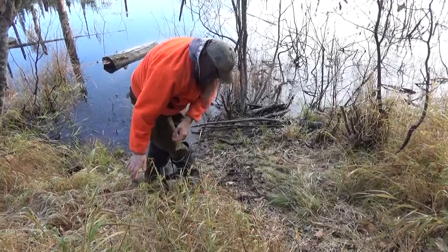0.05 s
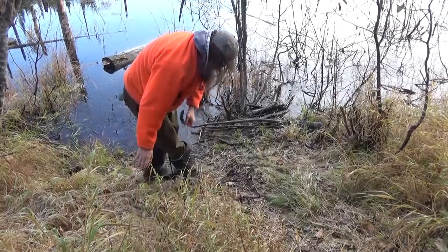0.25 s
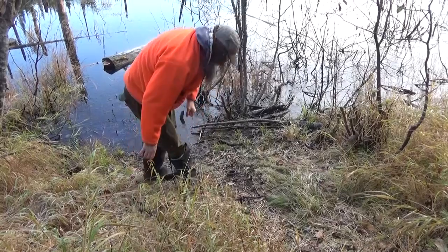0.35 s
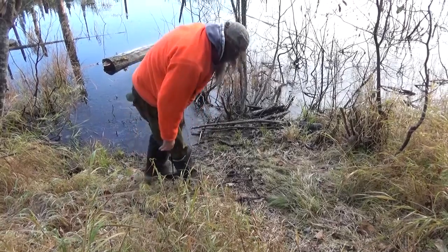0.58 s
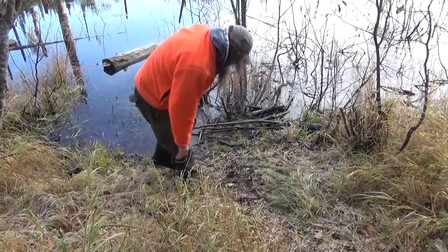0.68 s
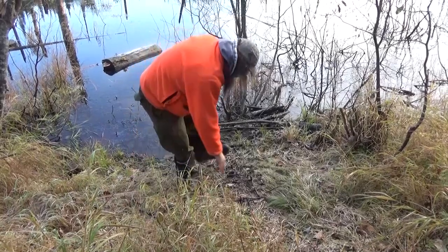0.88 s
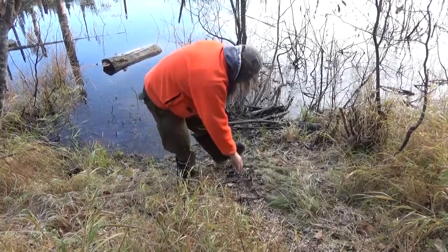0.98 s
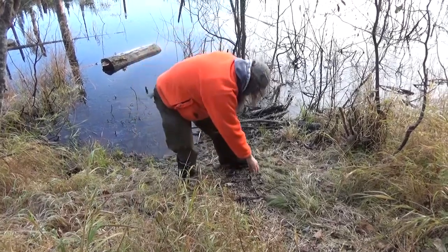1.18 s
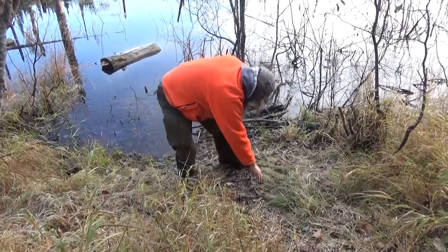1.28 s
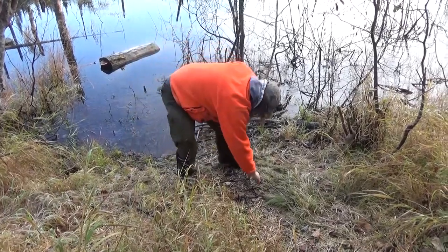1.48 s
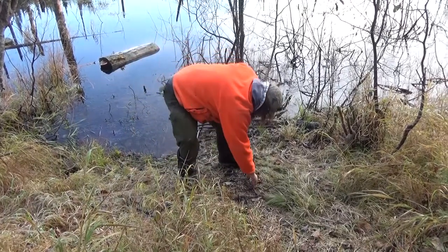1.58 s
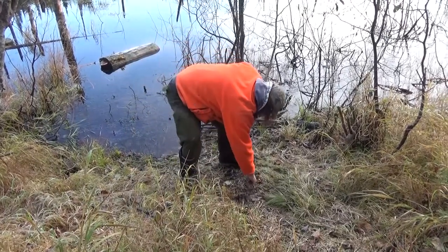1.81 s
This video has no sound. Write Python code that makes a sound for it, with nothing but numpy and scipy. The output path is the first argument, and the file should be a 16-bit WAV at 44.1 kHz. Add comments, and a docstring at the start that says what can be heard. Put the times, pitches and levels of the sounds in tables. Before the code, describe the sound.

Brief bright clatter of a dropped metal trap and chain, then dry grass rustles softly.

```python
"""Steel trap dropped on a riverbank

A few metres from a stereo microphone, a little left, a steel trap and its chain slide through dry grass
and clatter onto the bank. Links knock against the ringing jaws, the trap settles with one last clack,
and the trees return a faint tail. Then grass rustles, a boot presses the wet ground and something
small ticks, over quiet open air and a low hum."""
import sys
import numpy as np
from scipy import signal
from scipy.fft import rfft, irfft
from scipy.io import wavfile

SR = 44100
rng = np.random.default_rng(int(sys.argv[2]) if len(sys.argv) > 2 else 0)


def waveform_to_disk(signal):
    """Save audio, clipped to [-1, 1], as 16-bit WAV at the path in sys.argv[1]."""
    frames = np.transpose(np.atleast_2d(signal))
    scaled = np.clip(frames, -1, 1) * 32767
    samples = np.round(scaled).astype(np.int16)
    wavfile.write(sys.argv[1], SR, samples)


N = 81585
T = np.arange(N) / SR
EDGE_HZ = 15850  # top of the recorder's band
CONTACT_S, GROUNDED_S = .0005, .5  # attack of steel on steel; when the trap comes to lie in the grass


def amp(db):
    """Decibels to gain."""
    return 10 ** (np.asarray(db) / 20)


def unit(x):
    """Scales to rms 1."""
    return x / np.sqrt(np.mean(x ** 2) + 1e-20)


def read(points, hz):
    """Reads a table on a log-frequency axis."""
    f, value = np.transpose(points)
    return np.interp(np.log(hz + 1), np.log(f + 1), value)


def colour(x, points):
    """Filters by a table of f/Hz, gain/dB."""
    size = x.shape[-1]
    return irfft(rfft(x) * amp(read(points, np.fft.rfftfreq(size, 1 / SR))), size)


def add(mix, s, sound):
    """Mixes a sound in at s seconds."""
    part = mix[max(round(s * SR), 0):][:len(sound)]
    part += sound[:len(part)]


def decay(t, t60):
    """Falls by 60 dB in t60 seconds."""
    return np.exp(-np.log(1000) * t / t60)


def strike(t, t60, hold=0):
    """Envelope of struck steel: a fast rise, then a decay that starts at hold seconds."""
    return np.minimum(t / CONTACT_S, 1) * decay(np.maximum(t - hold, 0), t60)


def drift(rate_hz):
    """Slow random wander of rms 1."""
    lowpass = np.exp(-(np.fft.rfftfreq(N, 1 / SR) / rate_hz) ** 2)
    return unit(irfft(rfft(rng.standard_normal(N)) * lowpass, N))


def burst(db, hz, octaves, t60):
    """A dying puff of noise around one frequency."""
    t, f = T[:8192], np.fft.rfftfreq(8192, 1 / SR)
    band = np.exp(-.5 * (np.log2((f + 1) / hz) / octaves) ** 2)
    noise = unit(irfft(band * np.exp(2j * np.pi * rng.random(len(f)))))
    return amp(db) * noise * np.minimum(t * hz, 1) * decay(t, t60)


def crackle(spectrum, per_s=5000, spread_db=.5):
    """Dense tiny clicks of uneven size, coloured by a spectrum, at rms 1."""
    sizes = rng.standard_normal(N) * amp(spread_db * np.minimum(rng.exponential(1, N), 4))
    return unit(colour(sizes * (rng.random(N) < per_s / SR), spectrum))


# Stereo width of the surroundings at the microphone: f/Hz, side gain/dB
WIDTH = [(200, -22.5), (600, -8.5), (5000, -6), (11000, -15)]
def widen(mid, side):
    """Mid and side to left and right, nearly mono in the bass."""
    return mid + np.array([[1], [-1]]) * colour(side, WIDTH)


# Open air over the bank: f/Hz, gain/dB
AIR_SPECTRUM = [(30, -29), (70, -14.5), (200, -9), (300, -2), (420, -5), (1200, -2), (1900, -6.5),
                (3200, -14), (5000, -19), (9000, -25), (12500, -23.5), (15500, -23)]
def air(db=-59.5):
    """A quiet, steady wash of noise all around the microphone."""
    mid, side = (amp(db) * unit(colour(rng.standard_normal(N), AIR_SPECTRUM)) for _ in range(2))
    return widen(mid, side)


# Steady upper lines of the hum: f/Hz, level/dB
HUM_LINES = [(193.6, -74), (289, -72), (1008, -70.5), (1338, -69)]
# Level of the lowest line, which drops out twice as the recorder's noise suppression ducks it:
# t/s, level/dB
HUM_LOW_LEVEL = [(.15, -89), (.45, -69.5), (.9, -71), (1.17, -87), (1.45, -74)]
def hum(lowest_hz=95.5, waver=.0066):
    """A faint hum in the centre, each line wavering in pitch on its own."""
    out = np.zeros(N)
    for hz, db in [(lowest_hz, np.interp(T, *np.transpose(HUM_LOW_LEVEL)))] + HUM_LINES:
        pitch = hz * (1 + waver * drift(rate_hz=21.6))
        out += np.sqrt(2) * amp(db) * np.sin(2 * np.pi * np.cumsum(pitch) / SR)
    return out


# Decay of the tail from the trees: f/Hz, time to fall by 66 dB/s
TREE_DECAY = [(200, 6.3), (1400, 2.13), (3000, 0.45), (8000, 0.65), (15000, 0.22)]
def trees(x, db=-19.5, rise_s=.008):
    """Trunks and the far bank scatter a faint one-second tail back to the microphone."""
    hz, t, spectra = signal.stft(rng.standard_normal((2, SR)), SR, nperseg=256)
    fade = 0.00049 ** (t / read(TREE_DECAY, hz)[:, None])
    scatter = signal.istft(spectra * fade, SR, nperseg=256)[1][:, :SR]
    mid, side = scatter * np.minimum(T[:SR] / rise_s, 1)
    tail = widen(mid, side) / np.linalg.norm(mid)
    return amp(db) * signal.fftconvolve(x[None], tail, axes=1)[:, :N]


# Small ticks in the background: t/s, level/dB, centre f/Hz
TICKS = [(0.108, -42, 5700), (1.549, -51, 5500), (1.561, -50, 5100), (1.575, -51, 5930), (1.594, -51, 5100),
         (1.619, -54, 5040)]
def ticks():
    """Faint high ticks: one at the start, a short run near the end."""
    out = np.zeros(N)
    for s, db, hz in TICKS:
        add(out, s, burst(db, hz, octaves=.21, t60=.026))
    return out


# Rustle of dry grass: f/Hz, gain/dB
GRASS_SPECTRUM = [(80, -69), (500, -11.5), (2000, -7.5), (3500, -11), (5200, -5.5), (6800, -4.5),
                  (8400, 0.5), (10500, -4), (12000, -12), (15500, -23.5)]
# How hard the grass is brushed: t/s, level/dB
BRUSHING = [(0, -48.5), (.154, -50), (.159, -42.5), (.188, -39.5), (.196, -35.5), (.22, -34), (.3, -47.5),
            (.48, -47.5), (.6, -53.5), (.67, -52), (.75, -64), (1.11, -67), (1.126, -48.5), (1.15, -58),
            (1.172, -44), (1.205, -53.5), (1.28, -59), (1.302, -52.5), (1.335, -60.5), (1.43, -61),
            (1.475, -55.5), (1.52, -63), (1.85, -65)]
# Single stalks snapping: t/s, level/dB, centre f/Hz
SNAPS = [(.955, -40.5, 7340), (1.3227, -39.5, 9700), (1.478, -49, 5800), (1.595, -50, 3560)]
def grass():
    """Brushed dry stalks crackle with tiny breaks, and a few snap."""
    out = crackle(GRASS_SPECTRUM) * amp(np.interp(T, *np.transpose(BRUSHING)))
    for s, db, hz in SNAPS:
        add(out, s, burst(db, hz, octaves=.45, t60=.006))
    return out


# Squelch of wet leaves underfoot: f/Hz, gain/dB
SQUELCH_SPECTRUM = [(80, -47), (300, -31), (1100, -8), (1800, 7.5), (3000, 5), (4500, -3), (12000, -32)]
def boot(peak_s=1.472, db=-52, rise_s=.04, fall_s=.017):
    """One step presses wet leaves: the squelch swells and dies quickly."""
    press = np.exp(-np.maximum((peak_s - T) / rise_s, (T - peak_s) / fall_s))
    return amp(db) * press * crackle(SQUELCH_SPECTRUM)


# Dull blows on soft ground: t/s, level/dB, centre f/Hz, t60/s
THUDS = [(.2395, -32.5, 880, .03), (1.4765, -48, 720, .04)]
def soil(sink_s=.238, sink_db=-50.5, length_s=.022, start_hz=380, sag_octaves=1.5):
    """Dull thuds, and a low push whose pitch falls as the bank gives way under the trap."""
    out = np.zeros(N)
    for s, db, hz, t60 in THUDS:
        add(out, s, burst(db, hz, octaves=.18, t60=t60))
    progress = np.arange(0, 1, 1 / (length_s * SR))
    pitch = start_hz * 2 ** (-sag_octaves * progress)
    push = np.sin(np.pi * progress) * np.sin(2 * np.pi * np.cumsum(pitch) / SR)
    add(out, sink_s, amp(sink_db) * push)
    return out


# Short rings of the chain: f/Hz
CHAIN_HZ = [4107, 4404, 4603, 5200, 5685, 6050, 6412, 8230]
def jangle(db=-5, t60=.05, detune=.008):
    """One shake of the chain: a different few of its rings stand out each time."""
    t, count = T[:4096], len(CHAIN_HZ)
    hz = np.array(CHAIN_HZ) * (1 + detune * rng.standard_normal(count))
    share = rng.exponential(1, count)
    rings = np.sin(2 * np.pi * (hz[:, None] * t + rng.random((count, 1))))
    return amp(db) * (share / np.linalg.norm(share) @ rings) * strike(t, t60)


# Single links and loose parts ringing out: t/s, f/Hz, level/dB, t60/s
CLINKS = [(.262, 5800, -19, .04), (.262, 7134, -23, .08), (.275, 8350, -24, .09), (.276, 6000, -22, .06),
          (.277, 10427, -33, .13), (.285, 12350, -39, .3), (.299, 8797, -23, .075), (.333, 3492, -27, .06),
          (.333, 8900, -28, .05), (.349, 2702, -30, .08), (.357, 3505, -30, .19), (.386, 8820, -22, .06),
          (.2212, 5750, -30, .03), (.3255, 5100, -28, .05), (.349, 5000, -28, .035), (.377, 5141, -28, .07),
          (.427, 4450, -35, .025), (.532, 3499, -36, .07), (.568, 4170, -41, .045), (.57, 6430, -46, .04),
          (.593, 6430, -43, .04)]
def clinks(twin_db=-9):
    """Each link rings with one mode and a weaker twin that beats against it."""
    out, t = np.zeros(N), T[:SR // 2]
    for s, hz, db, t60 in CLINKS:
        twin_hz = hz + rng.uniform(-58, 50)
        twin = amp(twin_db) * np.sin(2 * np.pi * (twin_hz * t + rng.random()))
        add(out, s, amp(db) * (np.sin(2 * np.pi * hz * t) + twin) * strike(t, t60))
    return out


# Colour of steel meeting steel: f/Hz, gain/dB
STEEL_SPECTRUM = [(500, -55), (1200, -37), (1900, -1), (2400, -10.5), (3150, -3), (4200, 7), (5400, 1),
                  (6100, 5.5), (6600, 1), (8400, 4), (10400, 1.5), (12000, -9), (15500, -22)]
def clack(low_db, top_db, count=160, uneven_db=4):
    """A crowd of quickly dying steel modes of uneven strength, held briefly while the parts chatter."""
    t = T[:4096]
    hz = (np.arange(count) + rng.random(count))[:, None] * EDGE_HZ / count
    strength = amp(uneven_db * rng.standard_normal((count, 1)))
    modes = (strength * np.sin(2 * np.pi * (hz * t + rng.random((count, 1))))).sum(0)
    tilt = [(1800, low_db), (4000, 0), (8500, 0.0015), (12000, top_db)]
    return colour(unit(colour(modes, STEEL_SPECTRUM)), tilt) * strike(t, t60=.03, hold=.0026)


def scrape(knocks, gain_db=-12, t60=.11):
    """Links slide on after each knock until the trap is grounded: a dense jingle in the gaps."""
    power = sum((amp(db) * decay(np.maximum(T - s, 0), t60) * (T > s)) ** 2
                for s, db, *_ in knocks if s < GROUNDED_S)
    return amp(gain_db) * np.sqrt(power) * crackle(STEEL_SPECTRUM)


# Modes of the jaws and spring: f/Hz, relative level/dB, t60/s
JAW_MODES = [(1335, -30, .7), (1654, -24, .2), (2158, -11, .14), (2377, -21, .15), (2765, -8, .07),
             (2816, 0, .13), (2845, -10, .09), (3492, -16, .19), (3737, -16, .13), (4210, -13, .13),
             (4978, -18, .2), (6070, -16, .18), (7635, -18, .2)]
def jaws(knocks, ring_kept=.86, kick_turns=.12, rattle_hz=70, rattle_db=3.5, rattle_turns=.1):
    """Loose jaws flutter as they ring; each knock chokes some ringing, adds more and nudges its phase."""
    hz, db, t60 = np.transpose(JAW_MODES)[:, :, None]
    out, ringing, phase = np.zeros(N), np.zeros(hz.shape), rng.random(hz.shape)
    flutter = amp(rattle_db * np.array([drift(rattle_hz) for _ in JAW_MODES]))
    wobble = rattle_turns * np.array([drift(rattle_hz) for _ in JAW_MODES])
    starts = [round(s * SR) for s, *_ in knocks]
    for start, end, (s, *_, ring_db) in zip(starts, starts[1:] + [N], knocks):
        now = slice(start, end)
        shortening = .68 if s > GROUNDED_S else 1  # the grass damps the steel
        fade = decay(T[:end - start], t60 * shortening)
        level = np.hypot(ring_kept * ringing, amp(ring_db + db)) * fade
        phase += kick_turns * rng.standard_normal(hz.shape)
        modes = np.sin(2 * np.pi * (hz * T[now] + phase + wobble[:, now]))
        out[now] = (level * flutter[:, now] * modes).sum(0)
        ringing = level[:, -1:]
    return out


# Steel knocking on steel: t/s, clack level/dB, low-end gain/dB, top-end gain/dB, jaw ring level/dB
KNOCKS = [(0.1594, -41.5, -9, 5, -70), (0.195, -32.5, -25, 10, -62), (0.2024, -27, -28, -6, -52),
          (.209, -28, -16, -8, -37), (0.2203, -30.5, -1, -13, -38), (0.232, -28, -6, 8, -46),
          (0.2364, -17.5, -5, -1, -22), (0.2397, -23.5, -4, -3, -19.5), (0.2425, -49, 2, -10, -39),
          (0.2624, -21.5, 9, -6, -28), (0.2694, -27.5, 0, 13, -22), (0.2722, -18.5, 4, 3, -35),
          (.2772, -17, -11, -10, -28), (0.283, -26.5, -8, 15.5, -26), (.2955, -23.5, 3, -24, -30.5),
          (0.3072, -25, -1, -30, -46), (0.3273, -28, -2, -15, -56), (0.3313, -23, -33, -4, -28.5),
          (0.3361, -21.5, -29, -13, -35), (0.3482, -23.5, -17, -29, -53), (0.353, -31, 0, -26, -51),
          (.359, -25.5, -22, -46, -32.5), (0.3728, -32, -6, -36, -52), (0.378, -36, -9, -25, -35.5),
          (0.3851, -23.5, -17, -21, -27), (0.394, -32, -35, -10, -54), (0.409, -34.5, -13, -36, -57),
          (0.427, -42, 5, -31, -54), (.441, -41.5, 9, -20, -41.5), (0.466, -35, 5, -10, -40),
          (0.476, -36.5, 0, -4, -52), (0.489, -46.5, -2, 13, -72), (0.5087, -25.5, -18, 0, -58),
          (0.5107, -22.5, 7, -9, -23.5), (0.5165, -20.5, -7, -2.5, -24.5), (0.526, -27, 9.5, -16, -28),
          (.569, -47.5, 21, -12, -49)]
def trap(low_cut_hz=770):
    """Every knock clacks, shakes the chain and rings the jaws; such small parts radiate no bass."""
    out = jaws(KNOCKS) + scrape(KNOCKS)
    for s, db, low_db, top_db, _ in KNOCKS:
        add(out, s, amp(db) * (clack(low_db, top_db) + jangle()))
    highpass = signal.butter(2, low_cut_hz, "high", fs=SR, output="sos")
    return signal.sosfilt(highpass, out + clinks())


# The trap's place, a little left of the microphone: f/Hz, left minus right/dB
TRAP_BALANCE = [(100, -8), (2800, 0.34), (5000, 3), (9000, 2.5), (14000, 0)]
def scene():
    """The bank from the microphone: trap and ground a few metres off, trees and open air around."""
    steel = trap()
    ground = grass() + boot() + soil() + ticks()
    placed_steel = np.array([colour(steel, [(hz, sign * db / 2) for hz, db in TRAP_BALANCE])
                             for sign in (1, -1)])
    balance_db = np.interp(T, [.3, .9], [1.4, -.7])  # the handling moves from left to right
    placed_ground = ground * amp(np.array([[.5], [-.5]]) * balance_db)
    return air() + hum() + trees(steel + ground) + placed_ground + placed_steel


def record(dry):
    """The recorder's band limit."""
    lowpass = signal.firwin(511, EDGE_HZ, window=("kaiser", 9), fs=SR)
    return signal.oaconvolve(dry, lowpass[None], "same")


dry = scene()
out = record(dry)
waveform_to_disk(out)
```